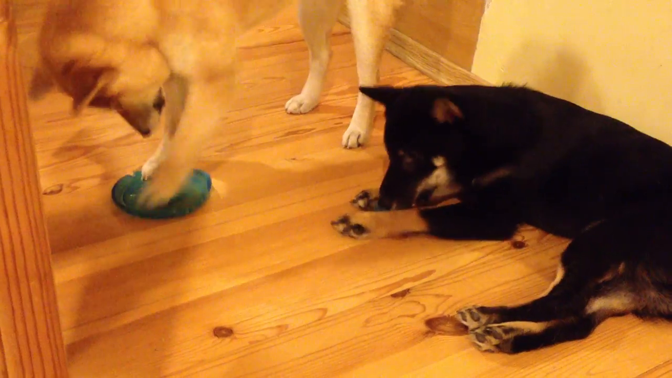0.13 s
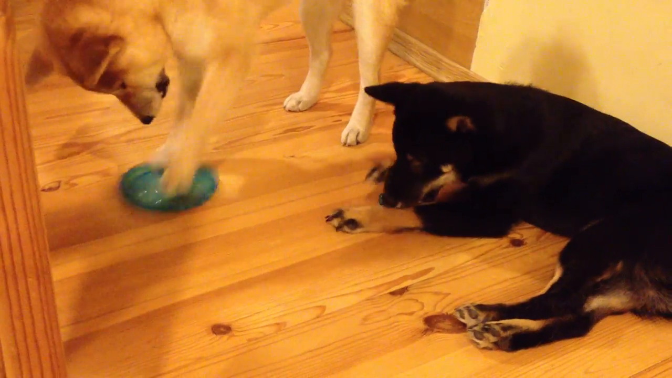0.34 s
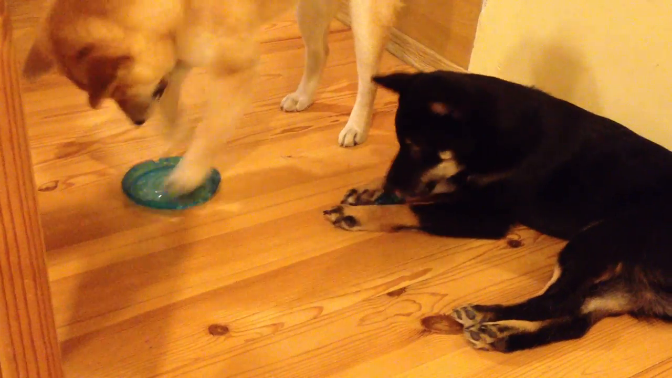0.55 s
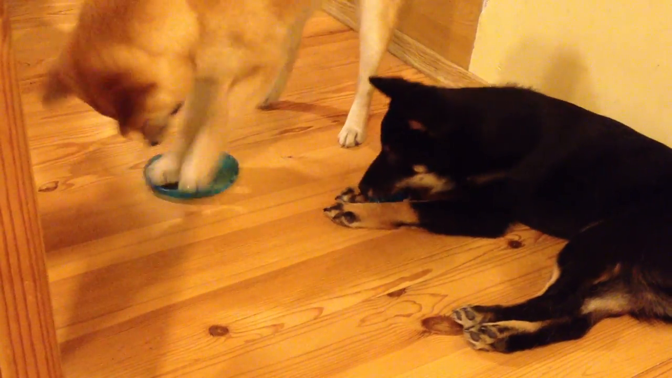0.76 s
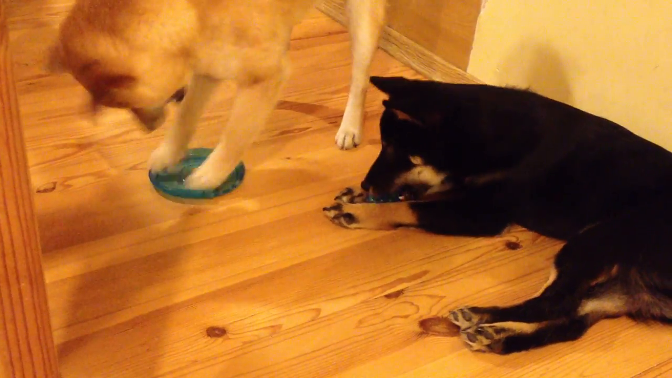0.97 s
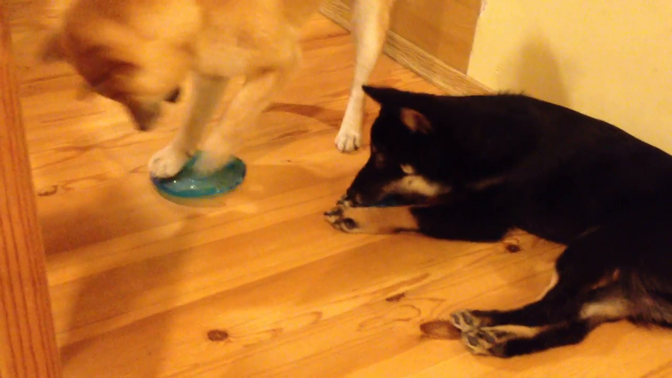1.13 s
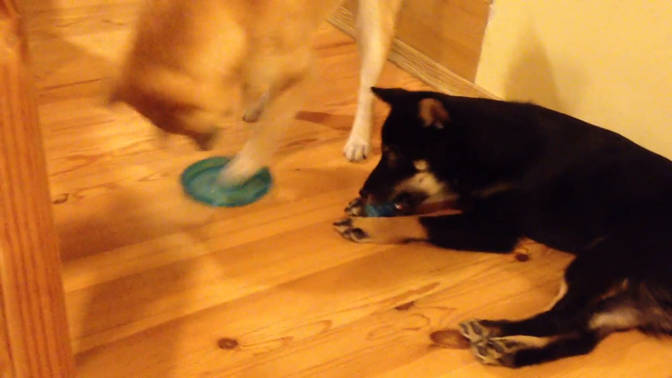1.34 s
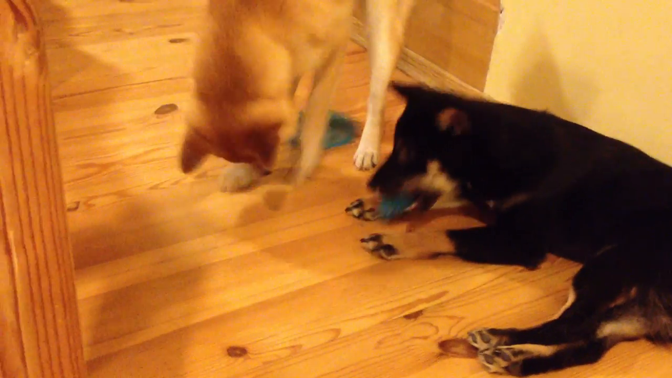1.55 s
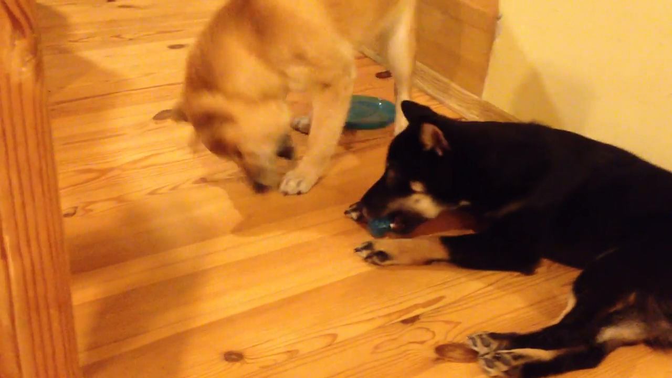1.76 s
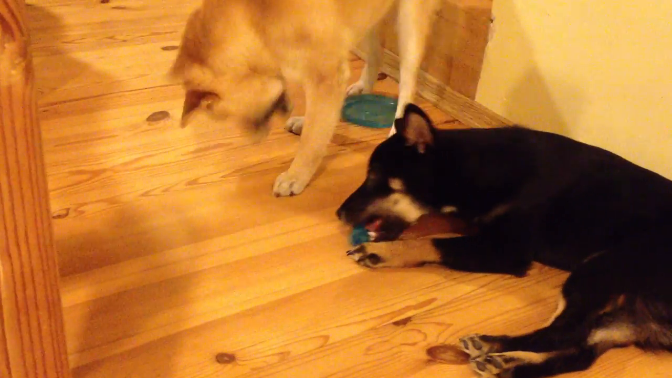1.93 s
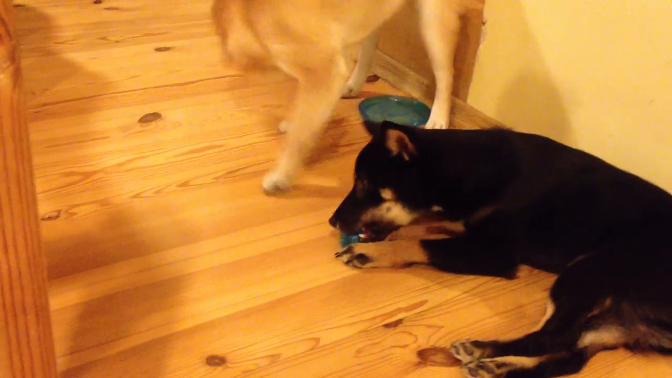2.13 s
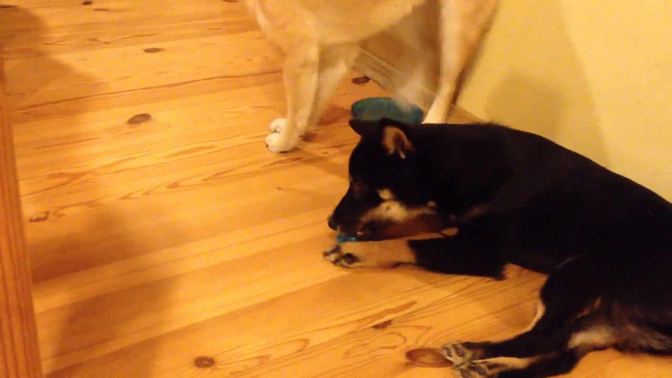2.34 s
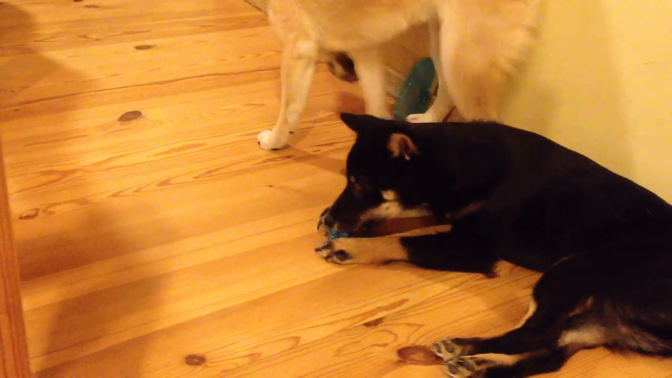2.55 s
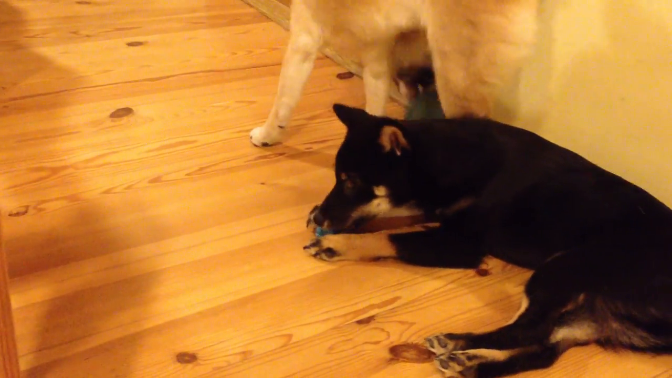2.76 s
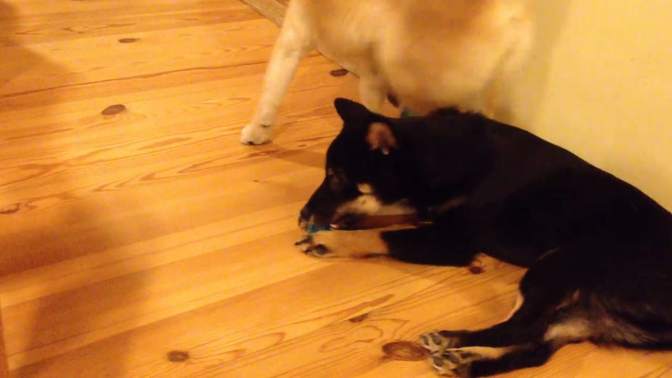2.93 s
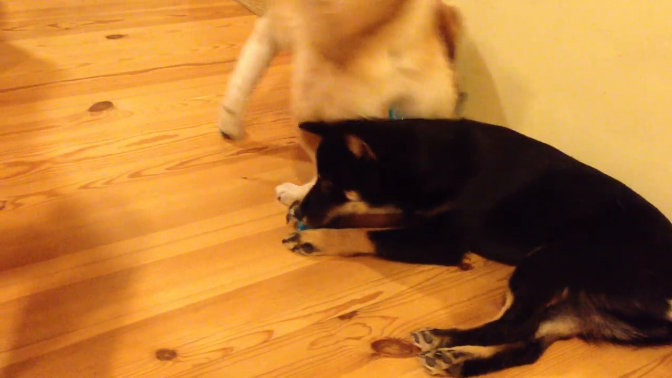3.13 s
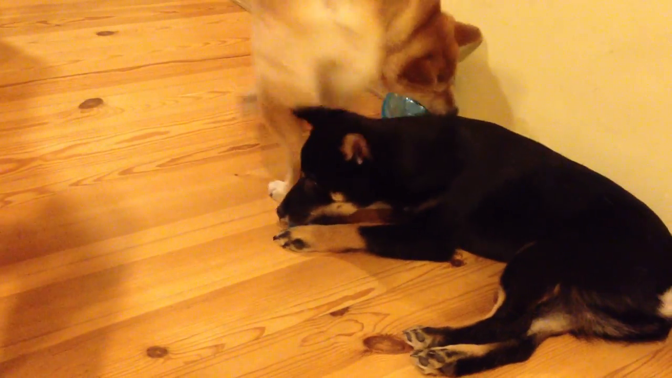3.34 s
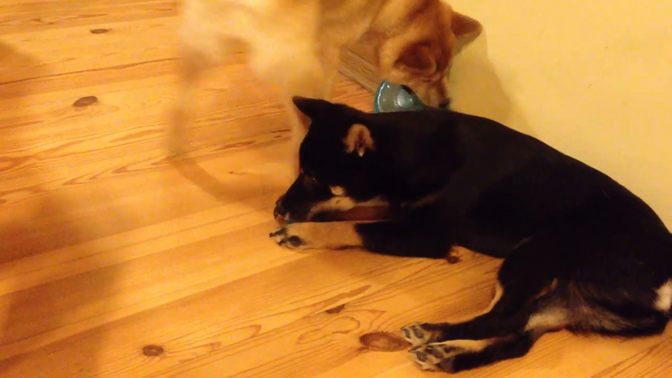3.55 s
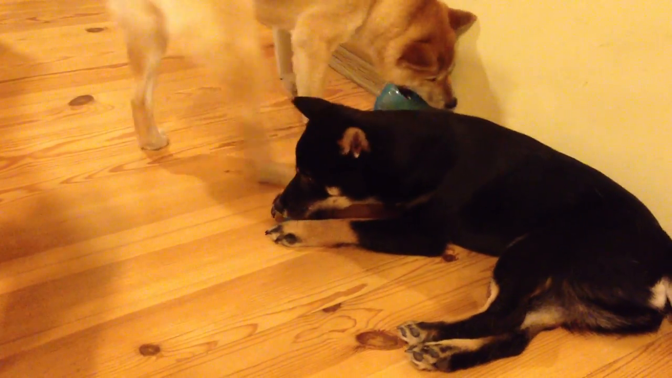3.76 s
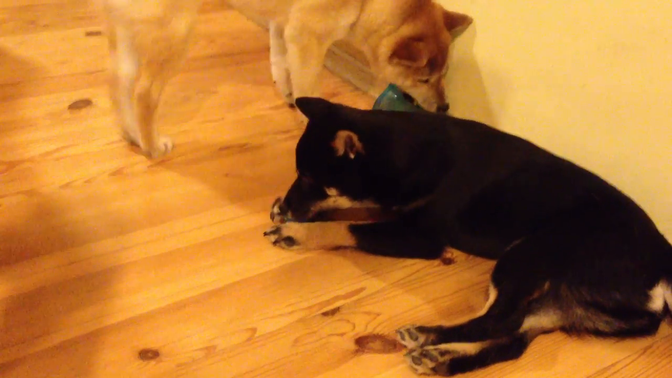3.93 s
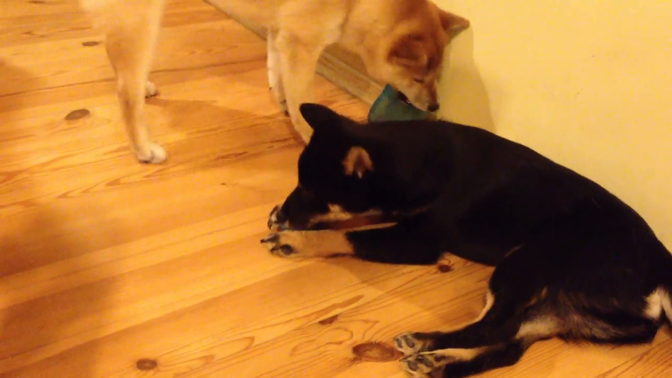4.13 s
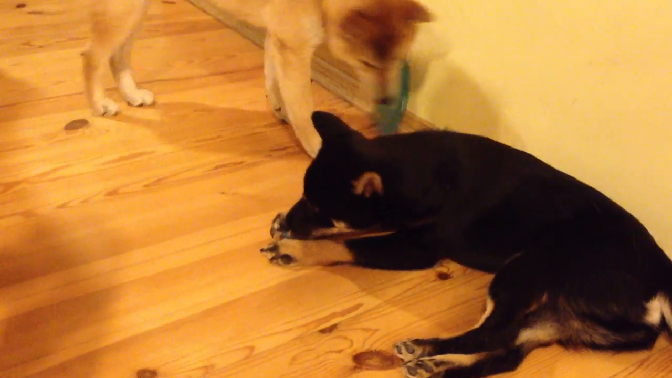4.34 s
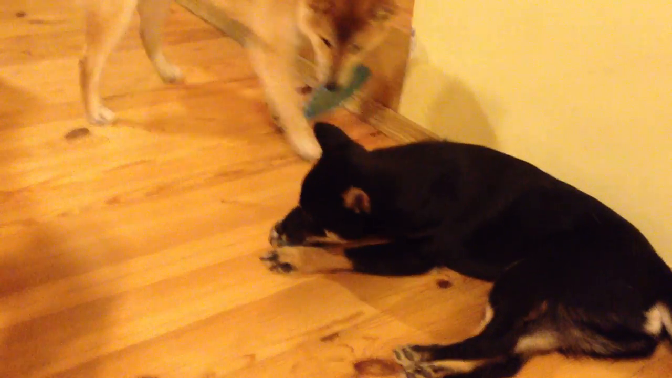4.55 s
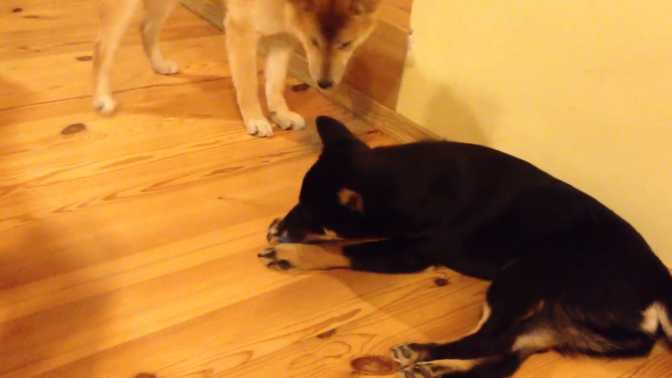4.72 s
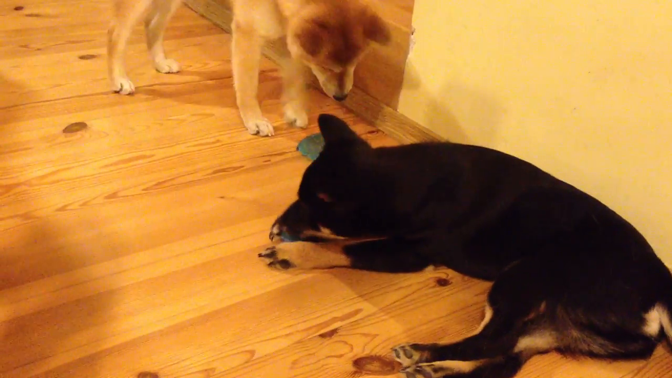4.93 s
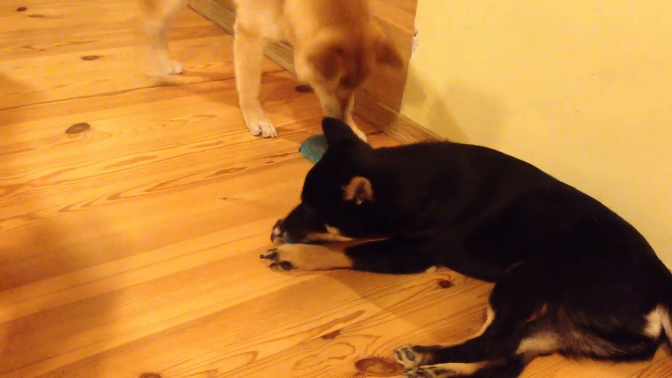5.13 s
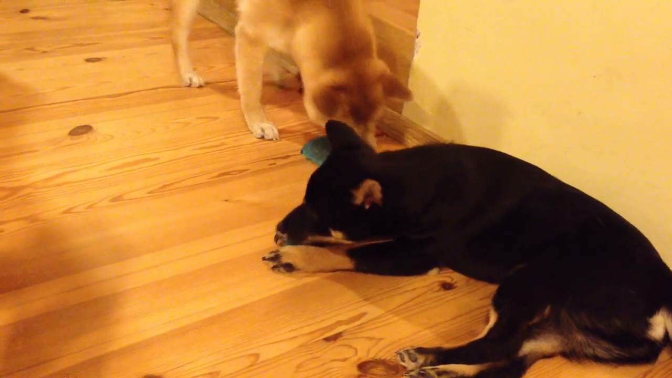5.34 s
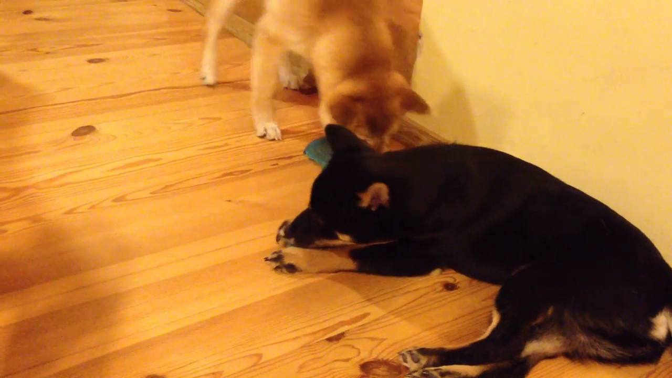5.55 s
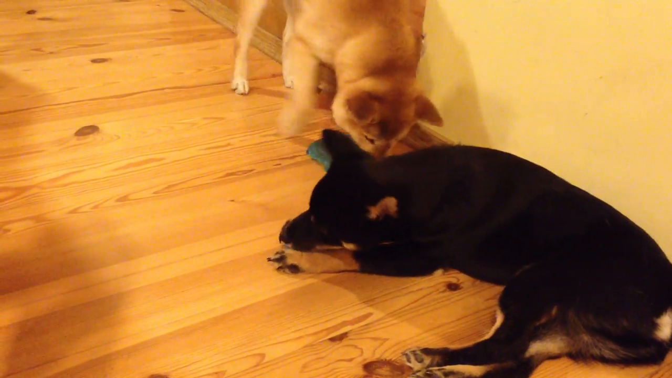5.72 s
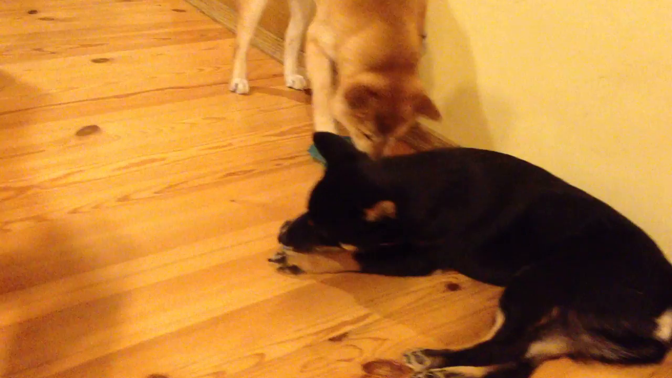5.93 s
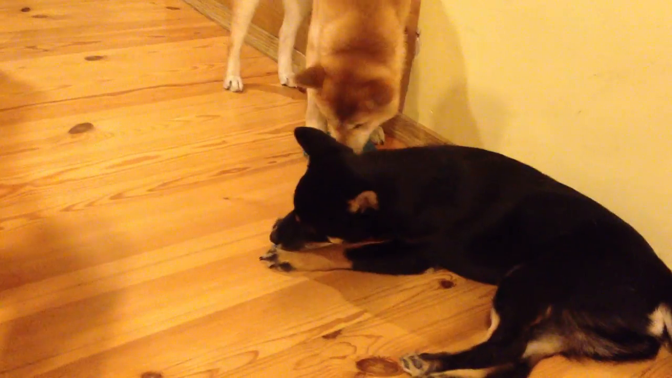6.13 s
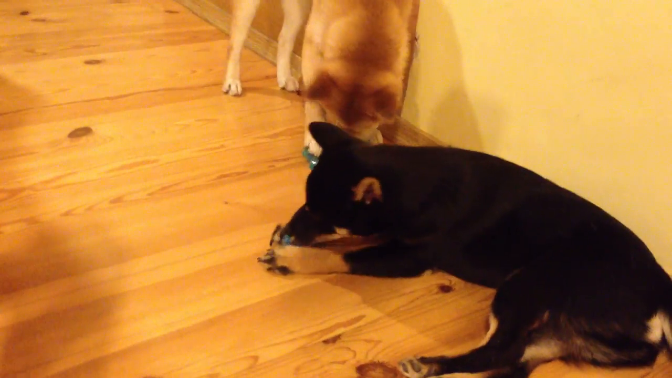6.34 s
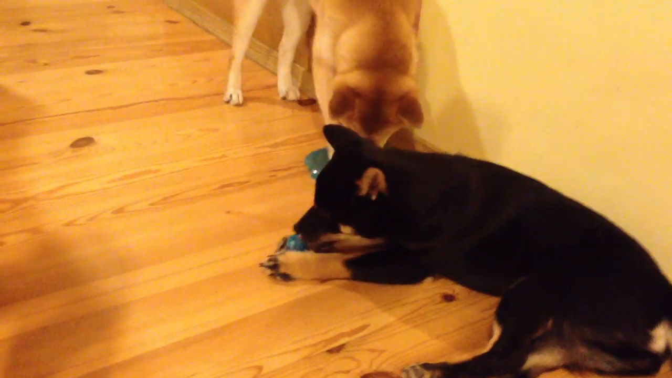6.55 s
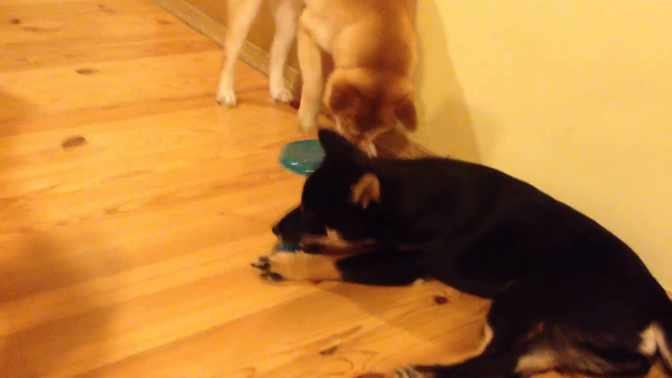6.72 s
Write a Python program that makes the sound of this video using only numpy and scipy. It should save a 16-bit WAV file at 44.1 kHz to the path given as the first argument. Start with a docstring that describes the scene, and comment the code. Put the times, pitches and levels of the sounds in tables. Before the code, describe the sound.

A small, reflective room with faint low room noise and tiny bumps, heard fairly close. From 0 to 1.5 s a dog paws a hard plastic dish on wooden boards: irregular hollow knocks around 0.2, 0.36, 0.45, 0.7, 0.9 and 1.2 to 1.3 s, strongest near 0.36 and 0.7, mixed with short stuttering scrapes and bright claw ticks. At 1.6 to 1.9 s come claw clicks, soft pads and slight nudges, then a lull. Footfalls and claws at 2.5 to 2.75 s lead to a small clatter at 2.8 to 2.9. Faint airy swishes, nudges and tiny gnawing clicks follow, with a light knock at 4.3. At 4.83 s the toy drops: by far the loudest sound, a sharp bright clack with brief plastic ring and quick wall echo. Faint claws and nosing continue; a moderate knock at 6.1 and a little scraping rattle at 6.65 to 6.75 s end it.

```python
"""Two young dogs with a plastic dish on a pine floor

In a small room one dog paws a hard dish-shaped toy, shoves it to the wall, picks it up and drops it, while
another gnaws nearby. Knocks, claws and paws are damped resonances with noise ticks; drags are stick-slip jerks,
and nosing is swelling noise. A dense noise tail makes the room; delayed copies make the quick echo off
the wall, strongest in the corner. Room noise and faint low bumps lie beneath."""
import sys
import numpy as np
from scipy import signal
from scipy.fft import rfft, irfft
from scipy.io import wavfile
from scipy.ndimage import uniform_filter1d

SR = 44100
rng = np.random.default_rng(int(sys.argv[2]) if len(sys.argv) > 2 else 0)


def int16_out(signal):
    """Quantize to a 16-bit WAV file."""
    q = np.round(np.clip(np.atleast_2d(signal).T, -1, 1) * 32767)
    wavfile.write(sys.argv[1], SR, q.astype(np.int16))


N = 298998
T = np.arange(N) / SR

# Toy knocks. Each row: start in seconds, ring of the dish in Hz, then the levels in dB, before the trims
# of each layer, of dish, rim and floorboard thud.
TOY_KNOCKS = [(0.0716, 970, -55, -67, -51), (0.0972, 1030, -50, -70, -48), (.198, 1150, -48.5, -58, -61),
              (0.2142, 1180, -42.5, -44.5, -62), (.2302, 1270, -42, -43.5, -65),
              (0.2435, 1110, -49, -57, -35.5), (0.3498, 1110, -47, -62, -64),
              (0.3611, 800, -30.5, -45.5, -32), (.4236, 1200, -45, -63, -43),
              (0.4515, 1264, -42.5, -46, -45), (0.6203, 1190, -41, -49, -50), (0.6786, 1220, -46, -52, -63),
              (0.6961, 1120, -38.5, -43, -31.5), (0.6996, 1314, -31, -44.5, -70),
              (0.8205, 1114, -42, -53, -65), (0.9074, 1360, -42, -50.5, -67), (0.9167, 1150, -54, -60, -49),
              (1.0303, 1140, -52, -59, -54), (1.2086, 1132, -33, -50.5, -53), (1.238, 960, -42, -47.5, -44),
              (1.3094, 1190, -42.5, -51, -36), (2.816, 820, -36.5, -47, -30.5),
              (2.8195, 673, -44.5, -67, -47), (2.829, 1026, -38, -43, -57),
              (2.9026, 657, -40.5, -46.5, -42), (4.3095, 860, -41, -43.5, -35),
              (4.3123, 481, -43.5, -72, -66), (4.335, 620, -48.5, -70, -49), (4.8058, 1280, -41, -42, -39),
              (4.829, 1314, -18.5, -19, -25.5), (6.1086, 1306, -32, -36.5, -38.5),
              (6.1125, 778, -40.5, -56, -58), (6.659, 1270, -51.5, -56, -64),
              (6.674, 1200, -41.5, -40, -44), (6.7254, 1550, -46, -44, -54),
              (6.7451, 1155, -38, -64, -45.5)]
# Spectrum of a hard contact, before any tilt. Each row: frequency in Hz, level in dB.
CONTACT_SPECTRUM = [(60, -30.5), (300, -19), (1200, -6), (2200, 3), (2550, -9), (2950, -2), (3500, -10),
                    (4500, -4), (6100, -6), (8200, -7), (9600, -15), (14600, -16.5), (16000, -19)]

HIT_S = 0.008  # a blow's level in dB is that of its energy spread over this time
# the dish dies away sooner the higher it rings: decay at DISH_HZ, and the power of the pitch
DISH_HZ, DISH_DECAY_S, DISH_DAMPING = 1160, 0.0019, 1.8
RIM_HZ, UPPER_RIM_HZ = 1734, 2276
PAWED_UNTIL_S = 1.5  # the toy is pressed under the paws until here, then lies free
TICK_LAG_S = 0.001  # the crack comes as the edge bites
# the tilted toy brushes the boards just before it lands
GRAZE_LEAD_S, GRAZE_DB, GRAZE_MAX_DB = 0.00499, -11, -62
NUDGE_RIM_DB, NUDGE_THUD_DB = -10, -5  # against the dish
RIM_RATTLE_DB, SCRAPE_BOARD_DB = -12.5, -5.5  # rim buzz and board rumble in a scrape, against the dish
CLAW_TILT_DB, SCRATCH_TILT_DB = 0.9, 0.5  # brightness of taps and scratches, dB per octave
BITE_HZ, SWISH_HZ = 1650, 6000
ROOM_DULL_HZ, ROOM_DULL_DB = 5000, -1  # the walls return less of the top treble, dB per octave
WALL_ECHO_S = 0.0132
FLUTTER_DB = -9  # loss on the second trip across the corner
TOP_HZ = 15500


def undb(db):
    """Decibels to gain."""
    return 10 ** (np.asarray(db) / 20)


def unit(x):
    """Scale to rms 1."""
    return x / np.sqrt(np.mean(x ** 2))


def blow(x, db):
    """Give a short sound the energy of db held for HIT_S."""
    return x * undb(db) * np.sqrt(HIT_S * SR / np.sum(x ** 2))


def add(out, s, x):
    """Mix x into out from time s."""
    i = int(s * SR)
    out[i:i + len(x)] += x[:max(N - i, 0)]


def band(x, lo_hz, hi_hz, order=2):
    """Causal band-pass."""
    sos = signal.butter(order, [lo_hz, min(hi_hz, 0.45 * SR)], "band", fs=SR, output="sos")
    return signal.sosfilt(sos, x)


def colour(x, points):
    """Shape x by a curve of (Hz, dB) points, then scale to rms 1."""
    hz, db = np.transpose(points)
    f = np.maximum(np.fft.rfftfreq(len(x), 1 / SR), 1)
    gain = undb(np.interp(np.log(f), np.log(hz), db))
    return unit(irfft(rfft(x) * gain, len(x)))


def tilted(points, tilt_db):
    """A spectrum made brighter by tilt_db per octave."""
    return [(hz, db + tilt_db * np.log2(hz)) for hz, db in points]


def noise(points, size):
    """Coloured noise of rms 1."""
    return colour(rng.standard_normal(size), points)


def dense(envelope, width_hz):
    """Countless overlapping rings: noise under an envelope, equally strong in every band of width_hz."""
    size = 2 * len(envelope)
    spectrum = rfft(rng.standard_normal(len(envelope)) * envelope, size)
    power = uniform_filter1d(np.abs(spectrum) ** 2, int(width_hz * size / SR) + 1)
    return irfft(spectrum / np.sqrt(power + 1e-18), size)[:len(envelope)]


def swell(start, end, edge):
    """Half a second of envelope: a stroke that fades in and out over the share edge of its length."""
    u = T[:SR // 2] / max(end - start, 0.01)
    return np.sin(np.pi / 2 * np.clip(np.minimum(u, 1 - u) / edge, 0, 1)) ** 2


def slips(size, rate, spread_db):
    """Stick and slip: randomly timed, uneven little jerks of either sign, about rate per second."""
    sizes = undb(spread_db * np.minimum(rng.exponential(size=size), 3))
    signed = sizes * rng.choice([-1, 1], size)
    return signed * (rng.random(size) < rate / SR)


def ring(hz, rise_s, decay_s):
    """A heavily damped resonance that needs a moment to build up."""
    t = T[:SR // 8]
    return (1 - np.exp(-t / rise_s)) ** 2 * np.exp(-t / decay_s) * np.sin(2 * np.pi * hz * t)


def tick(db, decay_s, tilt_db=0):
    """The bright crack of two hard things meeting, and the brief chatter after it."""
    t = T[:SR // 16]
    snap = dense(np.exp(-t / 0.0016), width_hz=2700)
    chatter = dense(np.exp(-t / decay_s), width_hz=630)
    snap = colour(snap, tilted(CONTACT_SPECTRUM, tilt_db - 0.2))
    chatter = colour(chatter, tilted(CONTACT_SPECTRUM, tilt_db))
    crack = snap + undb(4.0) * chatter
    return blow(crack * (1 - t / t[-1]), db)


def thud(db):
    """The floorboard gives under a blow: a few low modes, soon damped."""
    # Floorboard modes. Each row: frequency in Hz, level in dB, decay in seconds.
    board_modes = [(238, -20, 0.0067), (353, 5.5, 0.0018), (508, 9.5, 0.0011)]
    board = sum(undb(mode_db) * ring(hz, 0.00032, decay_s) for hz, mode_db, decay_s in board_modes)
    return blow(band(board, 120, 800, order=3), db)


def background():
    """The quiet room, with faint low bumps as the dogs shift their weight."""
    # Shape of the room's quiet. Each row: frequency in Hz, relative density in dB per Hz.
    quiet_spectrum = [(30, -35.5), (60, -22.5), (125, -11.5), (180, 2.5), (245, -6), (300, -4.5), (430, -4),
                      (700, -12.5), (1500, -16.5), (3200, -24), (5000, -22), (8000, -24.5), (10000, -31),
                      (14000, -24.5), (16000, -32.5)]
    bumps = signal.fftconvolve(slips(N, rate=22, spread_db=7.0), ring(185, 0.0049, 0.013))[:N]
    return undb(-63.98) * noise(quiet_spectrum, N) + undb(-75.0) * unit(bumps)


def room(x):
    """A small bare room: a dense tail that starts within milliseconds and dies at its own pace in each octave."""
    # Decay of the room, before the closing fade. Each row: frequency in Hz, t60 in seconds.
    room_decay = [(100, .48), (300, 0.46), (800, 0.32), (1700, 0.47), (5000, 0.42), (13000, 0.34)]
    hz, t60 = np.transpose(room_decay)
    t = T[:int(0.7 * SR)]
    onset = np.clip((t - 0.002) / 0.0018, 0, 1)
    mean_rate = 1 / t60.mean()
    spectrum = rfft(dense(onset * np.exp(-np.log(1000) * t * mean_rate), width_hz=85))
    log_f = np.log2(np.maximum(np.fft.rfftfreq(len(t), 1 / SR), 1))
    tail = 0
    # overlapping octave bands, each corrected from the mean decay to its own
    for octave in range(5, 15):
        part = irfft(spectrum * np.maximum(1 - np.abs(log_f - octave), 0), len(t))
        part = part * undb(ROOM_DULL_DB * max(octave - np.log2(ROOM_DULL_HZ), 0))
        rate = 1 / np.interp(octave, np.log2(hz), t60)
        tail = tail + part * np.exp(-np.log(1000) * t * (rate - mean_rate))
    tail *= np.minimum(1, 2 - 2 * t / t[-1])  # fade the second half to nothing
    return signal.fftconvolve(x, tail / np.sqrt(np.sum(tail ** 2)))[:N]


def swishes():
    """Airy, faintly whistling swells of muzzle and fur as the dog noses about: noise peaking at SWISH_HZ."""
    # Soft swishes. Each row: start in seconds, end in seconds, level in dB.
    strokes = [(2.995, 3.22, -67.5), (3.546, 3.69, -73), (3.916, 4.242, -67.5), (4.626, 4.75, -60),
               (5.25, 5.44, -81), (5.744, 5.87, -71)]
    out, hz = np.zeros(N), SWISH_HZ
    points = [(200, -14), (hz / 3, -8), (hz * 0.85, -8), (hz, 0), (hz * 1.12, -6), (hz * 2.2, -13)]
    for start, end, db in strokes:
        air = noise(points, SR // 2)
        add(out, start, undb(db) * air * swell(start, end, edge=0.42))
    return out


def gnawing():
    """Teeth click on a chew, with many mostly fainter clicks of the mouth scattered throughout."""
    # Sharper bites. Each row: start in seconds, level of the ring in dB.
    sharp_bites = [(2.7152, -58), (3.9893, -66), (4.0457, -64.5), (4.2768, -62), (4.707, -59),
                   (6.0082, -63), (6.4005, -61.5), (6.5138, -61.5)]
    out = np.zeros(N)
    bites = [(s, BITE_HZ, db) for s, db in sharp_bites]
    faint = [(u * N / SR, 800 * 3 ** v, -75 + 7 * w) for u, v, w in rng.random((50, 3))]
    for s, hz, db in bites + faint:
        add(out, s, blow(ring(hz, 0.0001, 0.0006), db))
        add(out, s, tick(db - 5.5, decay_s=0.004))
    return out


def paws():
    """Soft pads landing on the boards excite only the low board modes."""
    # Pads landing. Each row: start in seconds, board pitch in Hz, level in dB before a trim.
    footfalls = [(1.66, 184, -42.5), (1.691, 199, -44.5), (1.966, 251, -52), (2.599, 230, -47.5),
                 (2.706, 286, -42.5), (2.758, 238, -38.5), (3.097, 189, -50.5), (4.313, 184, -45),
                 (5.228, 179, -49)]
    out = np.zeros(N)
    for s, hz, db in footfalls:
        add(out, s, blow(band(ring(hz, 0.0005, 0.0044), 130, 810), db - 4.5))
    return out


def claws():
    """Claws tap the boards and the toy's rim: a very short ring, a thud and a bright tick."""
    # Claw clicks, ringing more on the toy than on bare wood. Each row: start in seconds, ring in Hz,
    # then the levels in dB of ring, floorboard thud and tick, the last two before a trim.
    claw_taps = [(0.2798, 1170, -62, -38.5, -55), (.649, 1140, -49, -41.5, -47),
                 (0.8851, 1720, -43.5, -51, -46.5), (1.0606, 1050, -56, -69, -61),
                 (1.097, 1300, -47.5, -65, -56), (1.299, 1700, -47.5, -59, -55.5),
                 (1.3786, 1860, -58, -72, -53), (1.409, 1420, -45.5, -47, -52),
                 (1.4905, 1440, -60, -45.5, -43.5), (1.6382, 1460, -49, -68, -48),
                 (1.6498, 1510, -46, -68, -54), (1.6599, 2230, -50, -63, -52),
                 (1.761, 1640, -52, -54, -55.5), (2.3399, 1300, -65, -54, -54.5),
                 (2.5438, 1440, -52, -46.5, -56), (2.593, 1260, -55, -44, -50.5),
                 (3.1948, 2360, -51, -49.5, -56), (4.371, 1600, -51, -61.5, -51),
                 (5.225, 1480, -57.5, -53.5, -63.5), (5.2708, 2120, -57.5, -58, -60),
                 (5.5586, 1500, -63, -69, -57.5), (5.6004, 1660, -56.5, -49.5, -55),
                 (5.6272, 1930, -69, -56, -62), (5.8613, 1526, -63.5, -54.5, -71)]
    out = np.zeros(N)
    for s, hz, ring_db, thud_db, tick_db in claw_taps:
        add(out, s, blow(ring(hz, 0.00015, 0.00062), ring_db) + thud(thud_db - 6.5))
        add(out, s, tick(tick_db + 0.5, decay_s=0.008, tilt_db=CLAW_TILT_DB))
    return out


def scrapes():
    """Dragging jerks rattle dish and rim, rumble in the boards and scratch in the treble."""
    # Claws and toy dragging. Each row: start in seconds, end in seconds, ring of the dragged spot in Hz,
    # shell level in dB, scratch level in dB.
    drags = [(0.188, 0.26, 1220, -48.5, -61), (0.243, 0.3, 800, -46.5, -64), (0.375, 0.48, 950, -72, -59),
             (0.644, 0.736, 1180, -45.5, -63), (0.828, 0.908, 1170, -56.5, -65),
             (0.877, 0.919, 1420, -45.5, -54.5), (1.05, 1.108, 1200, -50.5, -56),
             (1.245, 1.313, 1120, -43.5, -51), (1.4, 1.524, 1470, -55.5, -60),
             (1.64, 1.679, 1590, -60, -50.5), (1.738, 1.764, 1390, -57.5, -61),
             (5.348, 5.443, 1380, -64, -78), (6.646, 6.758, 1205, -51, -62.5)]
    out = np.zeros(N)
    for start, end, hz, shell_db, scratch_db in drags:
        jerks = slips(SR // 2, rate=650, spread_db=1.0)
        # the dish answers a little below the ring of the spot
        dish = unit(band(band(jerks, hz * 0.65, hz * 0.88, order=1), 533, 2020))
        rim = undb(RIM_RATTLE_DB) * unit(band(jerks, 1850, 2400))
        boards = undb(SCRAPE_BOARD_DB) * unit(band(jerks, 212, 530))
        # each jerk opens a short burst of contact noise
        bursts = signal.lfilter([1], [1, -np.exp(-1 / (0.0012 * SR))], np.abs(jerks))
        scratch = bursts * noise(tilted(CONTACT_SPECTRUM, SCRATCH_TILT_DB), len(jerks))
        drag = undb(shell_db) * (dish + rim + boards) + undb(scratch_db) * unit(scratch)
        add(out, start, drag * swell(start, end, edge=0.1))
    return out


def toy_blows():
    """Knocks and muzzle nudges as (s, dish Hz, dish dB, rim dB, thud dB); a nudge barely stirs rim and boards."""
    # The muzzle nudges the toy. Each row: start in seconds, ring of the dish in Hz, level in dB.
    muzzle_nudges = [(1.804, 1220, -58), (1.8815, 1390, -60), (3.3046, 670, -57), (3.5584, 1140, -62.5),
                     (3.739, 652, -58.5), (3.855, 837, -53.5), (5.1768, 1230, -54), (5.3626, 1520, -59),
                     (5.4137, 1660, -61), (5.8382, 1640, -58.5), (6.5646, 1146, -62)]
    nudges = [(s, hz, db, db + NUDGE_RIM_DB, db + NUDGE_THUD_DB) for s, hz, db in muzzle_nudges]
    return list(TOY_KNOCKS) + nudges


def shell_ring():
    """The thin shell sings on after a blow to its rim, its modes in new random phases each time."""
    # Lasting modes of the plastic shell. Each row: frequency in Hz, relative level in dB, t60 in seconds.
    shell_modes = [(531, -6, .25), (635, 0.5, .24), (826, 6, 0.14), (987, -3, 0.276), (1050, -4, 0.13),
                   (1167, 3.5, 0.15), (1184, 5.5, 0.17), (1321, 5, 0.099), (1440, 4.5, 0.27),
                   (1714, 5, 0.21), (1730, -6.5, .33), (1880, -7, 0.28), (1920, -5, 0.42),
                   (1989, -1.5, 0.36)]
    t = T[:SR // 2]
    out = np.zeros(len(t))
    for hz, db, t60 in shell_modes:
        phase = rng.uniform(0, 2 * np.pi)
        out += undb(db) * np.exp(-np.log(1000) * t / t60) * np.sin(2 * np.pi * hz * t + phase)
    return out


def singing():
    """Every blow to the rim also wakes the lasting modes; light touches wake them less than in proportion."""
    out = np.zeros(N)
    hardest_db = max(rim_db for _, _, _, rim_db, _ in TOY_KNOCKS)
    for s, _, _, rim_db, _ in toy_blows():
        add(out, s, blow(shell_ring(), rim_db + 3 - 0.11 * (hardest_db - rim_db)))
    return out


def knocks():
    """The toy grazes, then hits floor or wall: a few cycles of the dish and of its stiffer rim, a thud and a tick."""
    out = np.zeros(N)
    for s, dish_hz, dish_db, rim_db, thud_db in toy_blows():
        # upper rim ring and tick in dB against the rim column, tick tilt in dB per octave
        pressed = s < PAWED_UNTIL_S
        upper_db, tick_db, tilt_db = (-1.5, 0.5, -0.5) if pressed else (-11, -12, 0)
        dish_decay_s = DISH_DECAY_S * (DISH_HZ / dish_hz) ** DISH_DAMPING
        dish = blow(band(ring(dish_hz, 0.00092, dish_decay_s), 440, 2300, order=3), dish_db)
        clack = blow(band(signal.unit_impulse(SR // 8), 754, 1400, order=3), dish_db - 5.5)
        rim = blow(band(ring(RIM_HZ, 0.00045, 0.0014), 1533, 1990, order=4), rim_db - 6.0)
        upper = blow(band(ring(UPPER_RIM_HZ, 0.0003, 0.00042), 1730, 2730), rim_db - 6.5 + upper_db)
        add(out, s, dish + clack + rim + upper + thud(thud_db - 5.5))
        graze = blow(clack + rim, min(dish_db + GRAZE_DB, GRAZE_MAX_DB))
        add(out, s - GRAZE_LEAD_S, graze)
        add(out, s + TICK_LAG_S, tick(rim_db + tick_db, decay_s=0.012, tilt_db=tilt_db))
    return out


def scene():
    """All contacts, their echo off the wall and the room, over a quiet background."""
    # Where the play is. Each row: time in seconds, room level in dB, wall echo level in dB.
    positions = [(0, -7.5, -12.5), (1.3, -4.5, -20), (2.8, -3, -8.5), (4.3, -4, -3.5), (4.83, -3, -5.5),
                 (6.099, -4, -3.5), (6.78, 0, -13.5)]
    s, room_db, wall_db = np.transpose(positions)
    direct = knocks() + scrapes() + claws() + paws() + gnawing() + swishes()
    out = direct + room(direct * undb(np.interp(T, s, room_db))) + singing()
    # the corner sends back mostly the clack, little of the tick
    echo = band(direct * undb(np.interp(T, s, wall_db)), 250, 3200, order=1)
    add(out, WALL_ECHO_S, echo)
    add(out, 2 * WALL_ECHO_S, undb(FLUTTER_DB) * echo)
    return (out + background())[None]


def record(dry):
    """A steep elliptic low-pass takes away the treble above TOP_HZ."""
    return signal.sosfilt(signal.ellip(10, 0.2, 70, TOP_HZ, fs=SR, output="sos"), dry)


dry = scene()
out = record(dry)
int16_out(out)
```